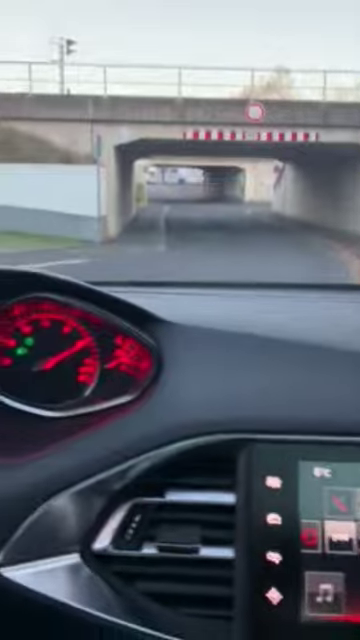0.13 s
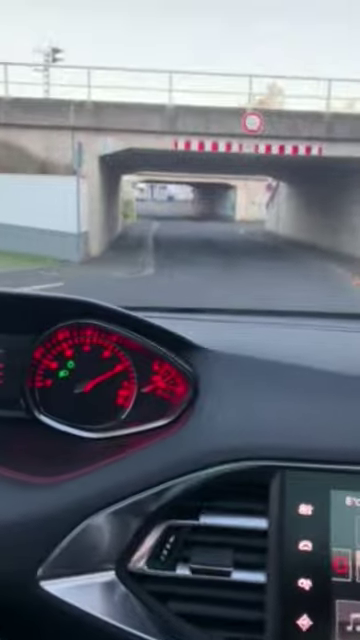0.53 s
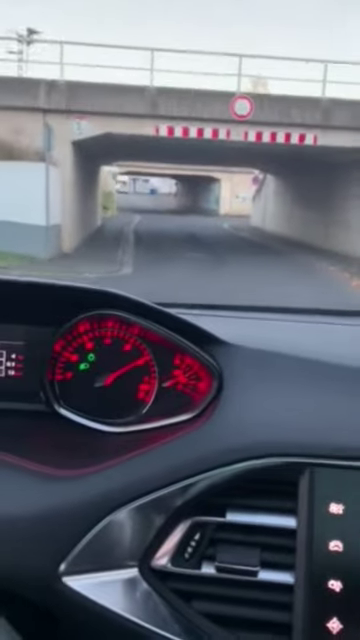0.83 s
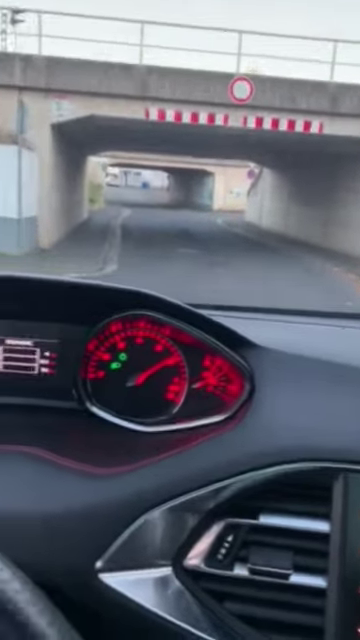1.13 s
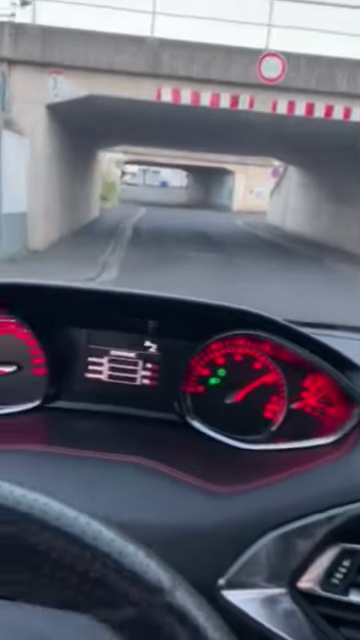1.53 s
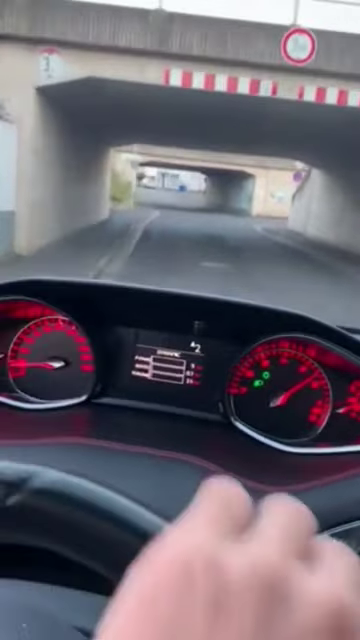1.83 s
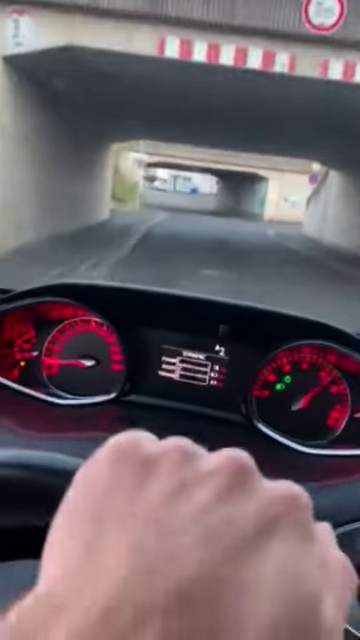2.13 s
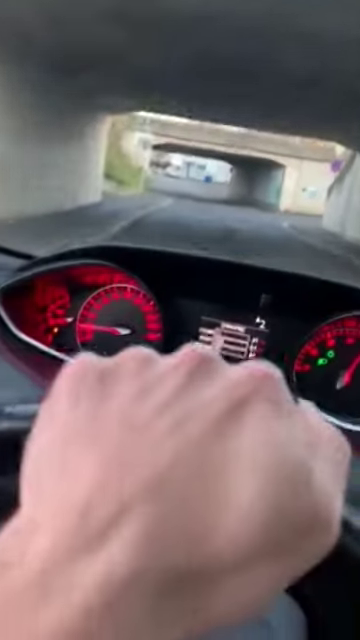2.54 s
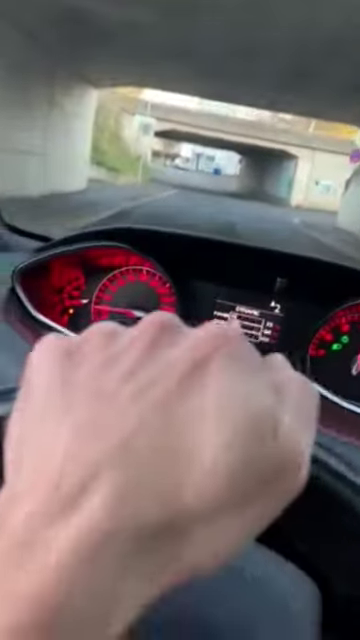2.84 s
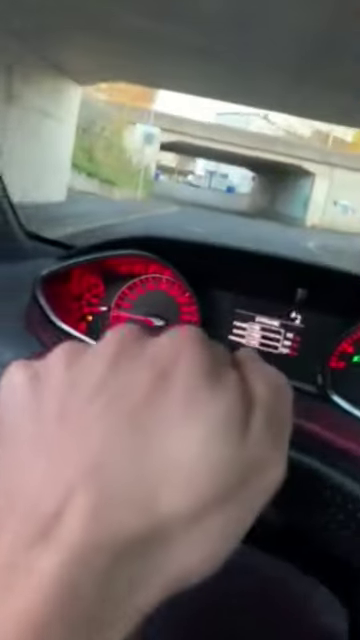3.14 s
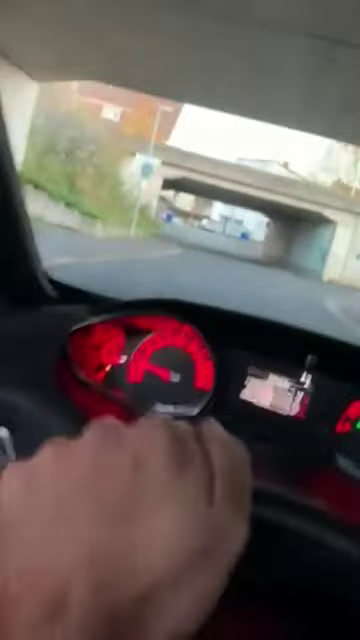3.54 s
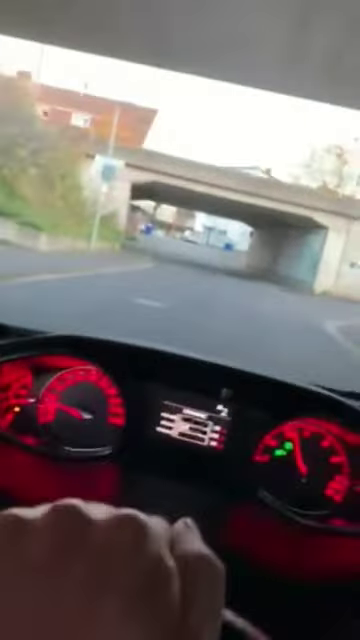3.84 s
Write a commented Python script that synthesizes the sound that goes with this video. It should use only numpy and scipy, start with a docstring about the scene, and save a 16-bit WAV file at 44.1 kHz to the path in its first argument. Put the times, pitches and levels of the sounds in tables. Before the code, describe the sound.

Inside a car entering an underpass, the engine starts as a dull low hum, then rises in pitch and loudness to a throbbing roar over growing road noise, ending with a short bark as the throttle lifts.

```python
"""Underpass, heard inside a small four-cylinder car accelerating hard, window ajar, phone in hand.
A steady hum of fan and body, road rumble, exhaust roar and tyre hiss are coloured noises that flicker.
The engine is a stack of tones locked to the firing rate: clean boom, wavering orders, brief flares
and a gear whine. At the end the exhaust barks, a short noise burst, as the throttle lifts."""
import sys
import numpy as np
from scipy import signal
from scipy.fft import rfft, irfft
from scipy.io import wavfile
from scipy.ndimage import uniform_filter1d

SR = 44100
rng = np.random.default_rng(int(sys.argv[2]) if len(sys.argv) > 2 else 0)


def master_out(mix):
    """Clip the mix to full scale and print it as 16-bit PCM to the path in sys.argv[1]."""
    frames = np.transpose(np.atleast_2d(mix))
    ceiling = np.clip(frames, -1, 1)
    pcm = np.round(ceiling * 32767).astype(np.int16)
    wavfile.write(sys.argv[1], SR, pcm)


N = 176400  # 4 s

# Fan and body hum: spectrum [pitch_hz, density_db, relative]
HUM_SPECTRUM = [(70, 1), (130, -7), (200, -8), (260, -19.5), (350, -16.5), (550, -29), (900, -24),
                (1400, -30), (2200, -44), (3400, -32.5), (5500, -65.5), (12300, -50), (15700, -48.5)]
HUM_DB, HUM_FLICKER_DB = -46.5, 2

# Road rumble through the body: level over time [time_s, level_db]
RUMBLE_LEVEL = [(0.2, -38), (0.4, -41), (0.59, -32), (0.74, -36), (1.11, -37.5), (2.19, -38), (2.78, -29.5),
                (2.97, -30), (3.21, -31.5), (3.31, -25), (3.46, -31.5), (3.58, -23), (3.8, -29.5),
                (3.89, -21), (4.0, -31.5)]
# Road rumble spectrum [pitch_hz, density_db, relative]
RUMBLE_SPECTRUM = [(18, -19), (26, -33.5), (36, -1), (48, 0), (62, -6), (85, -5.5), (125, -6.5), (170, -16),
                   (250, -23.5), (400, -50)]

# Exhaust roar and tyre hiss over time [time_s, roar_level_db, hiss_level_db]
ROAR_AND_HISS_LEVEL = [(.2, -58.5, -74), (1, -57, -72.5), (1.85, -55, -69.5), (2.1, -51, -65),
                       (2.4, -45.5, -62.5), (2.7, -43.5, -60), (3, -40.5, -56.5), (3.1, -38, -54.5),
                       (3.3, -36.5, -52.5), (3.55, -31, -46.5), (3.7, -34, -47), (3.94, -33.5, -50.5)]
# Tyre hiss spectrum [pitch_hz, density_db, relative]
HISS_SPECTRUM = [(1500, -8), (3000, 5), (4000, 4), (5000, 0), (7000, 1), (8700, -1), (12300, -2),
                 (12900, -8), (15700, -8)]
HISS_SWELL_DB, HISS_FLICKER_DB, HISS_FLICKER_HZ = .6, 1.4, 22
# Exhaust and intake roar spectrum [pitch_hz, density_db, relative]
ROAR_SPECTRUM = [(100, -4.5), (200, 6), (330, 1.5), (500, -1), (800, -0.5), (1100, -6.5), (1600, -6),
                 (2200, -11.5), (3200, -15.5), (5000, -31.5)]
PUFF_DEPTH = 0.04  # share of the roar that puffs once per firing

# Exhaust bark spectrum [pitch_hz, density_db, relative]
BARK_SPECTRUM = [(300, -20), (600, -5), (1000, -3.5), (1400, -5.5), (2000, -22), (3000, -22), (6000, -40)]
BARK_START_S, BARK_DB, BARK_RISE_S, BARK_T60_S = 3.96, -22, 0.014, 0.25

# Gear whine over time [time_s, level_db]
WHINE_LEVEL = [(.55, -72), (.7, -65), (1.15, -61), (1.24, -74), (1.55, -68), (1.76, -64), (1.85, -55),
               (1.97, -55), (2.03, -72), (4, -66)]
WHINE_MULTIPLE = 10  # of the firing rate
WHINE_FLICKER_DB = 1.5

# Orders swelling as they meet a resonance [middle_s, length_s, shaft_multiple, level_db]
ORDER_FLARES = [(2.08, .2, 3, -42), (2.16, .22, 13, -57), (2.37, .14, 13, -54), (2.39, .2, 16, -50),
                (2.71, .12, 22, -55), (3.1, .2, 20, -49), (3.15, .3, 16, -47), (3.13, .26, 12, -44),
                (3.16, .16, 8, -45), (3.41, .2, 12, -44), (3.4, .2, 14, -42), (3.58, .16, 8, -37),
                (3.71, .18, 7, -37), (3.82, .14, 12, -41)]
# Cabin resonances that lift or duck a passing order [centre_hz, width_hz, gain_db]
CABIN_MODES = [(130, 45, 14.5), (495, 39, -17)]
# Wavering orders, shaft multiples 3, 5, 7, 8 .. 16 [level_db, relative]
ORDER_DB = [4, 0.9, -4.5, -6, -14, -2, -5.5, -5.5, 0, -13.5, -10.5, -3]
# Overall level of orders and rasp over time [time_s, level_db]
LOAD_LEVEL = [(.2, -66.5), (1.8, -66), (2.2, -57.5), (2.7, -52.5), (3.05, -51), (3.4, -41.5), (3.6, -44.5),
              (4, -48)]
RASP_DB, RASP_DB_PER_OCTAVE = -9.5, -7  # shaft multiples 17-28 fall away from this level
ORDER_STEADY, FLARE_STEADY = .45, .8  # steady share of a wavering tone, 0-1
WAVER_HZ = 16

# Firing rate, twice the shaft rate [time_s, rate_hz]
FIRING_RATE = [(.2, 64.3), (.65, 68), (1.2, 73.5), (1.6, 78.5), (1.8, 81.8), (2, 86.3), (2.15, 93),
               (2.35, 102), (2.79, 123.7), (3.1, 140), (3.3, 149.5), (3.45, 157), (3.57, 163), (3.7, 157),
               (3.85, 157), (4, 159)]
JITTER, JITTER_HZ = 0.002, 12  # share of the firing rate, new values per second
# Boom at the firing rate over time [time_s, level_db]
BOOM_LEVEL = [(.2, -35), (.45, -41.5), (.69, -33), (.85, -46.5), (1.1, -33.5), (1.5, -35.5), (1.84, -43.5),
              (2.2, -32), (2.4, -36.5), (2.7, -44.5), (2.78, -32), (3.03, -44), (3.11, -28), (3.2, -34),
              (3.37, -26), (3.54, -33.5), (3.61, -21.5), (3.68, -35), (3.75, -19), (3.82, -30), (3.86, -21),
              (4, -43)]
# Tone an octave above the boom [time_s, level_db]
OCTAVE_LEVEL = [(.2, -40.5), (.45, -47), (.6, -38), (.75, -45), (1.1, -43.5), (1.6, -46.5), (1.9, -44.5),
                (2.22, -47), (2.32, -39.5), (2.55, -37), (2.72, -46), (2.9, -41), (3.1, -50), (3.35, -36.5),
                (3.55, -45.5), (3.7, -36.5), (4, -63)]
# Tone at three times the firing rate [time_s, level_db]
THIRD_LEVEL = [(.2, -62), (.75, -68), (1, -55.5), (1.5, -50.5), (1.7, -59), (2.35, -55), (2.5, -52.5),
               (2.8, -45), (3.2, -69), (3.5, -36), (3.62, -45), (4, -47.5)]

# Two microphone ports [pitch_hz, left_lead_rad, likeness_0_to_1, left_minus_right_db]
PORT_RESPONSE = [(20, 0, .999, -.3), (70, .02, .995, -.8), (140, .03, .98, -1.9), (300, .05, .87, -2.6),
                 (480, .1, .62, -1.5), (850, 1.2, .45, 0), (1500, 1.3, .55, .3), (2800, 2.5, .65, .4),
                 (4000, 2.2, .8, 0), (4700, 3.14, .98, 0), (15300, 18.85, .98, 0)]
START_S, TOP_HZ = .1770, 15700

TIME_S = np.arange(N) / SR
BIN_HZ = np.arange(N // 2 + 1) * SR / N


def undb(db):
    """Decibels to amplitude."""
    return np.exp(np.asarray(db) * (np.log(10) / 20))


def curve(table, column=1):
    """Automation lane: a table column joined by straight lines in time."""
    rows = np.array(table)
    return np.interp(TIME_S, rows[:, 0], rows[:, column])


def colour_db(table, hz):
    """A spectrum table read on a log-frequency axis."""
    rows = np.array(table)
    return np.interp(np.log(np.maximum(hz, 1)), np.log(rows[:, 0]), rows[:, 1])


def walk(rate_hz):
    """Random levels held 1 / rate s (rate capped at 90 Hz) and slewed twice; spread near 1."""
    held = np.repeat(rng.standard_normal(400), 8)
    slewed = uniform_filter1d(uniform_filter1d(held, size=8), size=8)
    position = np.arange(N) * (8 * min(rate_hz, 90) / SR)
    return 1.3 * np.interp(position, np.arange(len(held)), slewed)


def coloured(colour):
    """Spectra of two unrelated noises of one colour."""
    return rfft(rng.standard_normal((2, N))) * undb(colour_db(colour, BIN_HZ))


def noise(colour, shared_db, own_db, own_hz):
    """Two unrelated noises of one colour, rms 1; half-octave bands swell together and flicker alone."""
    spectra = coloured(colour)
    lowest_hz, highest_hz = colour[0][0], colour[-1][0]
    place = 2 * np.log2(np.maximum(BIN_HZ, 1) / lowest_hz)  # in half octaves
    swell_db = shared_db * walk(7.28)
    out = 0
    for band in range(int(2 * np.log2(highest_hz / lowest_hz)) + 2):
        share = np.clip(1 - abs(place - band), 0, 1)  # neighbouring bands crossfade
        flicker_db = own_db * walk(own_hz)
        out = out + irfft(spectra * share, N) * undb(swell_db + flicker_db)
    return out / np.sqrt(np.mean(out ** 2))


def hum():
    """Fan and body: a flickering noise bed whose overall level holds steady."""
    return undb(HUM_DB) * noise(HUM_SPECTRUM, 0.33, HUM_FLICKER_DB, 14)


def road_rumble():
    """Road through the body: low noise that surges and dips with its level lane."""
    return undb(curve(RUMBLE_LEVEL)) * noise(RUMBLE_SPECTRUM, 1.0, 1.0, 3.65)


def tyre_hiss():
    """Tyres: treble noise that grows as the car picks up speed."""
    hiss = noise(HISS_SPECTRUM, HISS_SWELL_DB, HISS_FLICKER_DB, HISS_FLICKER_HZ)
    return undb(curve(ROAR_AND_HISS_LEVEL, column=2)) * hiss


def exhaust_roar(turns):
    """Exhaust and intake: gas-flow noise, puffing slightly once per firing."""
    puff = 1 + PUFF_DEPTH * np.cos(2 * np.pi * turns)
    return undb(curve(ROAR_AND_HISS_LEVEL)) * puff * noise(ROAR_SPECTRUM, 0.095, 2.78, 18)


def exhaust_bark():
    """A rough burst from the exhaust: noise with a fast rise and exponential decay."""
    age_s = TIME_S - BARK_START_S
    rise = np.clip(age_s / BARK_RISE_S, 0, 1)
    decay = undb(BARK_DB - 60 * np.maximum(age_s, 0) / BARK_T60_S)
    gas = irfft(coloured(BARK_SPECTRUM), N)
    return rise * decay * gas / gas.std()


def phase(multiple, turns):
    """Angle of a tone locked to a multiple of the firing rate, from a random starting point."""
    return 2 * np.pi * (multiple * turns + rng.random())


def tone(multiple, turns):
    """A clean tone, rms 1, locked to the firing rate."""
    return np.sqrt(2) * np.cos(phase(multiple, turns))


def wavering_tone(multiple, turns, steady=ORDER_STEADY):
    """An engine order whose strength and phase wander: two quadratures modulated at random."""
    angle = phase(multiple, turns)
    in_phase = steady + (1 - steady) * walk(WAVER_HZ)
    quadrature = (1 - steady) * walk(WAVER_HZ)
    return np.sqrt(2) * (in_phase * np.cos(angle) + quadrature * np.sin(angle))


def gear_whine(turns):
    """Gears: one tone high above the firing rate, its level flickering."""
    level_db = curve(WHINE_LEVEL) + WHINE_FLICKER_DB * walk(18.35)
    return undb(level_db) * tone(WHINE_MULTIPLE, turns)


def cabin_gain(hz):
    """Cabin resonances: bell-shaped lifts and dips that an order sweeps through."""
    gain_db = 0
    for centre_hz, width_hz, peak_db in CABIN_MODES:
        gain_db = gain_db + peak_db / (1 + (2 * (hz - centre_hz) / width_hz) ** 2)
    return undb(gain_db)


def engine_orders(firing_hz, turns):
    """Wavering shaft multiples: lower ones shaped by the cabin, upper ones a falling rasp."""
    orders = 0
    for shaft_multiple, level_db in zip(np.r_[3, 5, 7:17], ORDER_DB):
        multiple = shaft_multiple / 2  # the shaft turns at half the firing rate
        orders = orders + undb(level_db) * cabin_gain(multiple * firing_hz) * wavering_tone(multiple, turns)
    rasp = 0
    for shaft_multiple in range(17, 29):
        level_db = RASP_DB + RASP_DB_PER_OCTAVE * np.log2(shaft_multiple / 17)
        rasp = rasp + undb(level_db) * wavering_tone(shaft_multiple / 2, turns)
    return undb(curve(LOAD_LEVEL)) * (orders + rasp)


def order_flares(turns):
    """Single orders meeting a resonance: each swells and fades in a half-cosine."""
    flares = 0
    for middle_s, length_s, shaft_multiple, level_db in ORDER_FLARES:
        swell = np.cos(np.pi * np.clip((TIME_S - middle_s) / length_s, -.5, .5))
        flares = flares + undb(level_db) * swell * wavering_tone(shaft_multiple / 2, turns, FLARE_STEADY)
    return flares


def firing_boom(turns):
    """Cylinder firings booming in the cabin: the firing tone and its second and third multiples."""
    boom = undb(curve(BOOM_LEVEL)) * tone(1, turns)
    octave = undb(curve(OCTAVE_LEVEL)) * tone(2, turns)
    third = undb(curve(THIRD_LEVEL)) * tone(3, turns)
    return boom + octave + third


def engine(firing_hz, turns):
    """The whole engine: whine, orders, flares and boom all locked to one firing rate."""
    return gear_whine(turns) + engine_orders(firing_hz, turns) + order_flares(turns) + firing_boom(turns)


def ports(alike, unlike):
    """Two microphone ports: left and right share most of the sound, shifted in phase; the rest differs."""
    rows = np.array(PORT_RESPONSE)
    lead_rad, like, pan_db = (np.interp(BIN_HZ, rows[:, 0], rows[:, k]) for k in (1, 2, 3))
    like = np.clip(like, 0, 1)
    side = np.array([[1], [-1]])  # left, right
    common = np.sqrt((1 + like) / 2) * rfft(alike)
    different = side * np.sqrt((1 - like) / 2) * rfft(unlike)
    shift = np.exp(.5j * side * lead_rad)
    return irfft((common + different) * shift * undb(side * pan_db / 2), N)


def scene():
    """Lay the noise beds under the engine and place all of it across the two ports."""
    firing_hz = curve(FIRING_RATE) * (1 + JITTER * walk(JITTER_HZ))
    turns = np.cumsum(firing_hz) / SR  # firings so far
    air = hum() + road_rumble() + tyre_hiss() + exhaust_roar(turns) + exhaust_bark()
    return ports(air[0] + engine(firing_hz, turns), air[1])


def record(dry):
    """The phone cuts the top with a steep low-pass; the sound sets in abruptly after a short silence."""
    opened = dry * (np.arange(N) >= START_S * SR)
    low_pass = signal.ellip(16, .2, 100, TOP_HZ, fs=SR, output="sos")
    return signal.sosfilt(low_pass, opened)


dry = scene()
out = record(dry)
master_out(out)
```